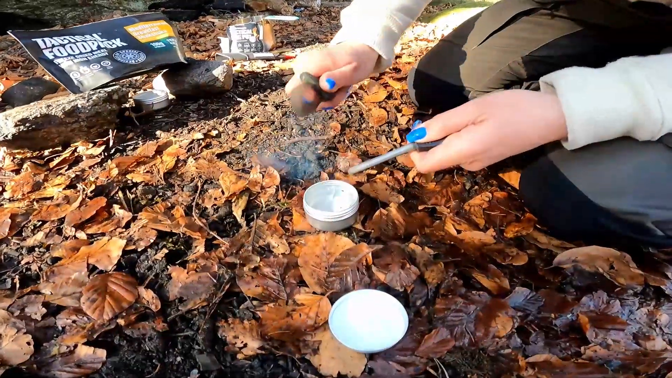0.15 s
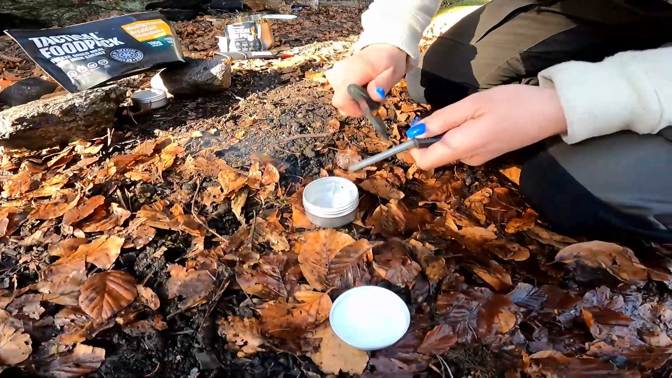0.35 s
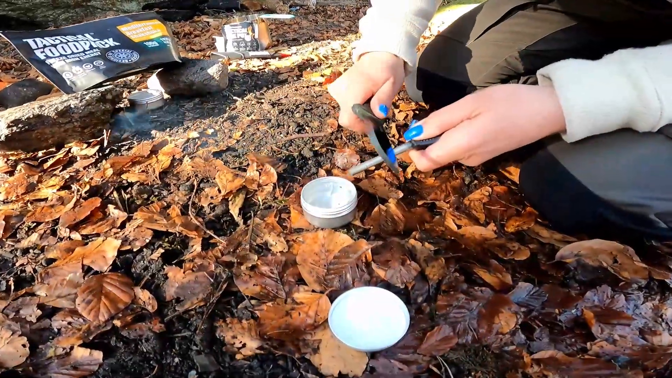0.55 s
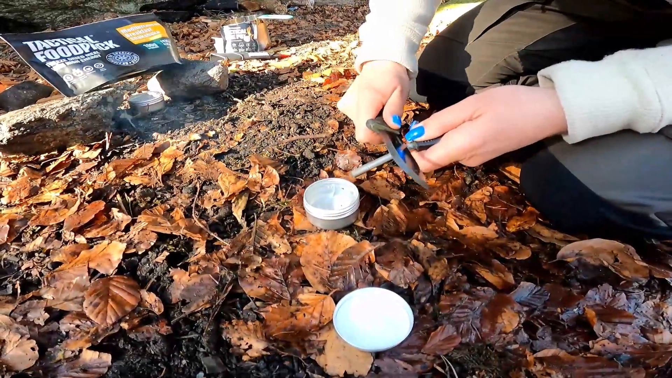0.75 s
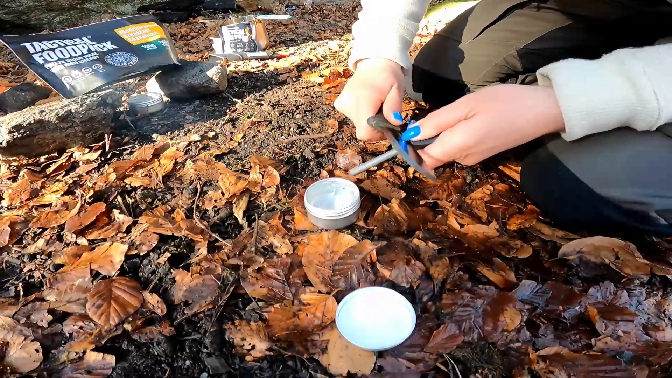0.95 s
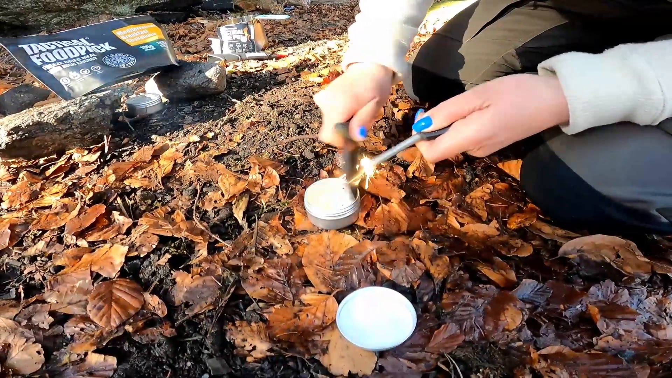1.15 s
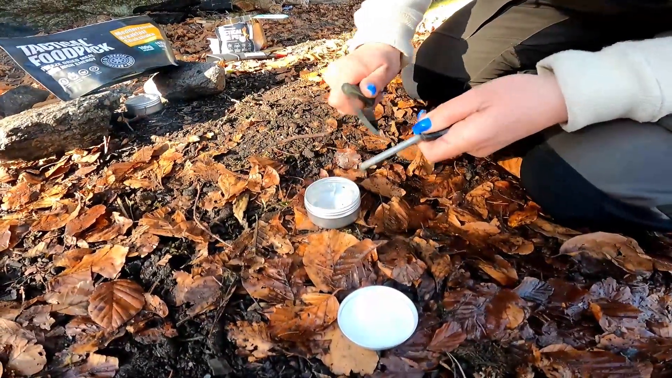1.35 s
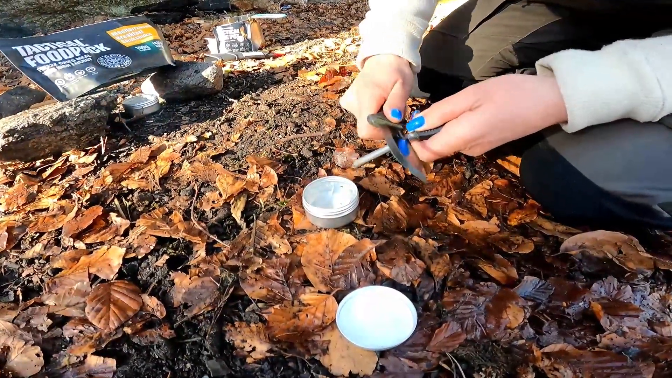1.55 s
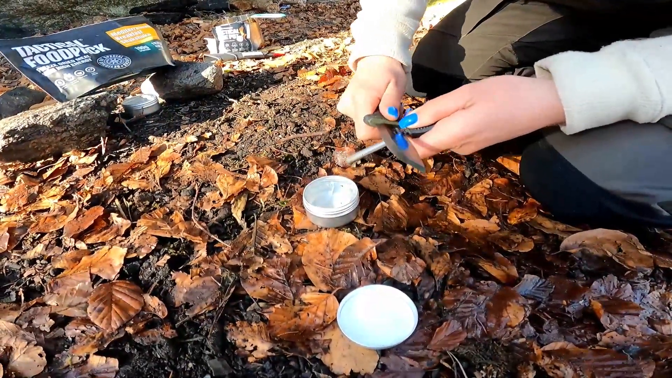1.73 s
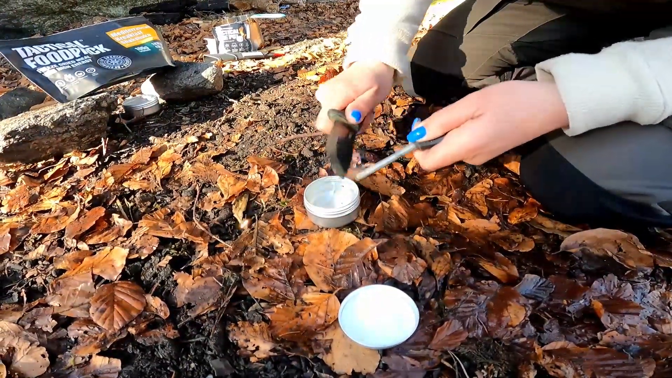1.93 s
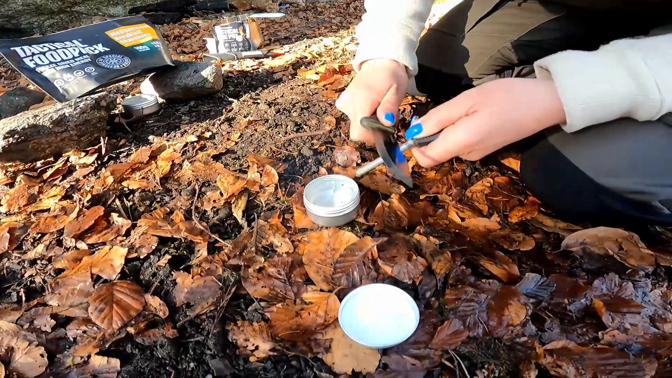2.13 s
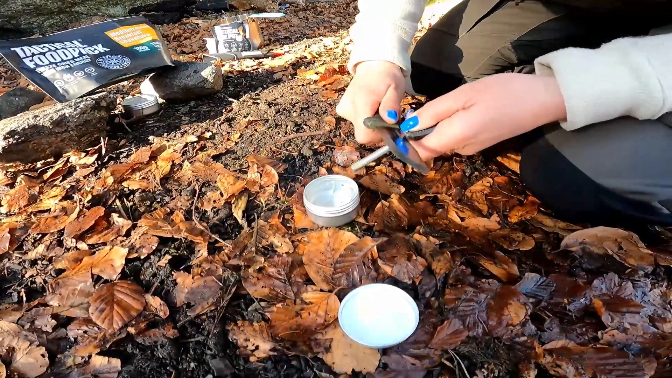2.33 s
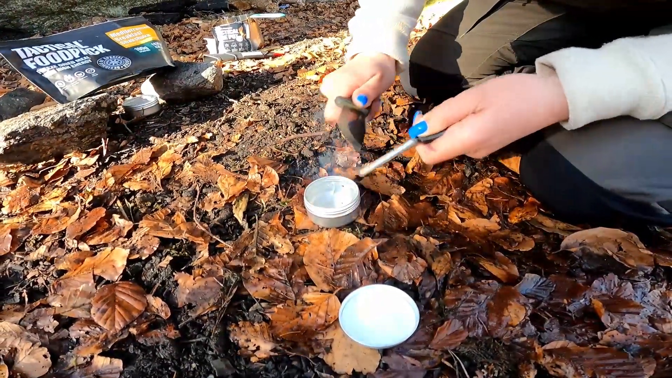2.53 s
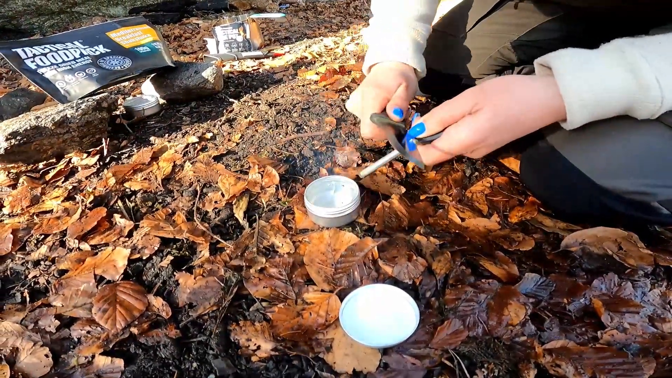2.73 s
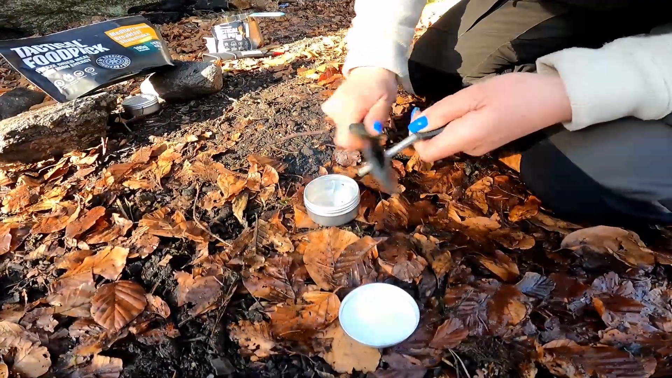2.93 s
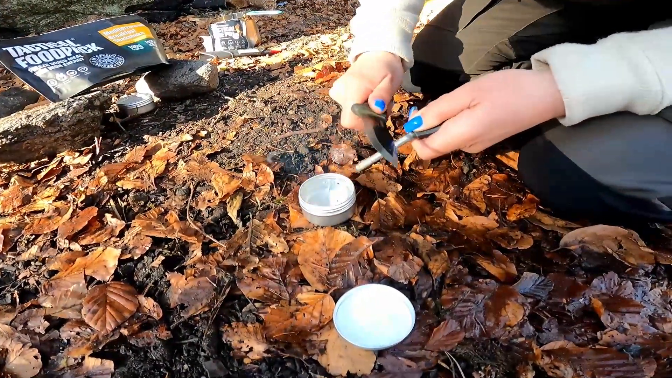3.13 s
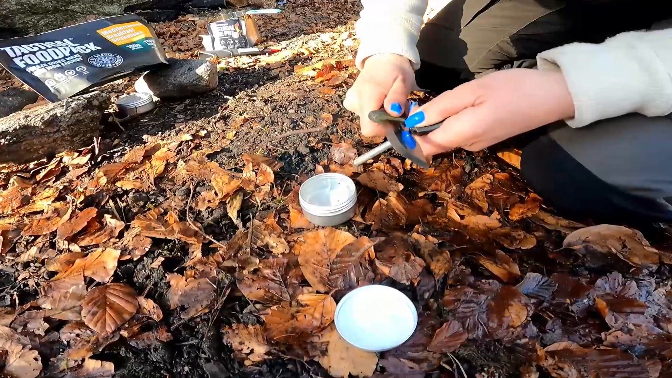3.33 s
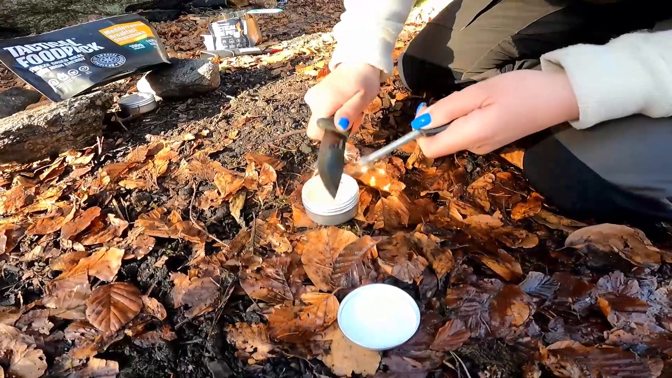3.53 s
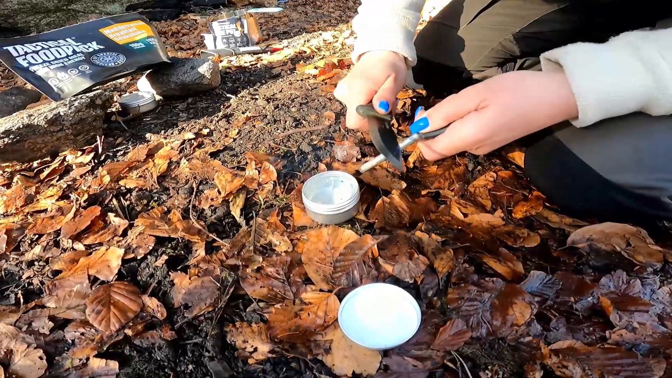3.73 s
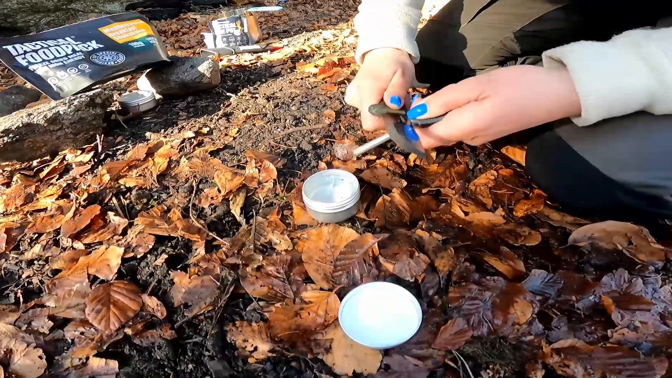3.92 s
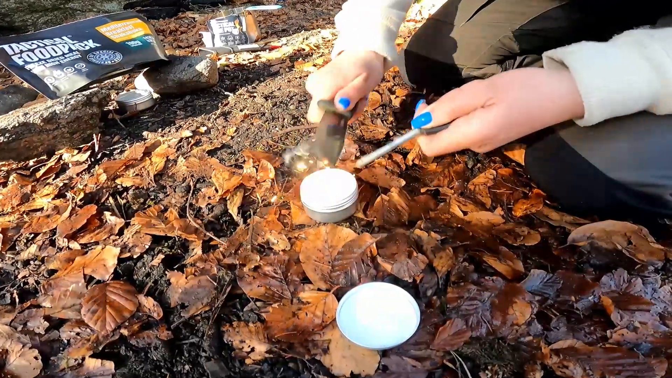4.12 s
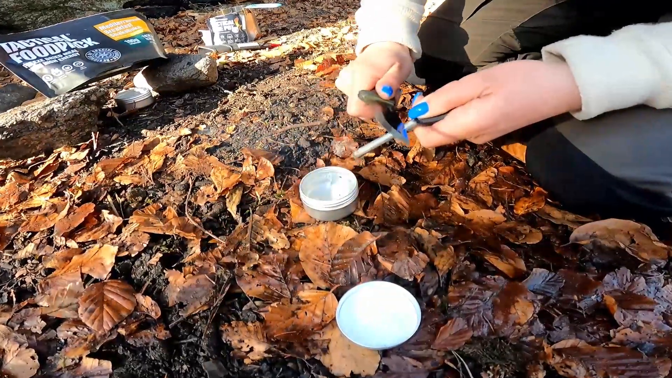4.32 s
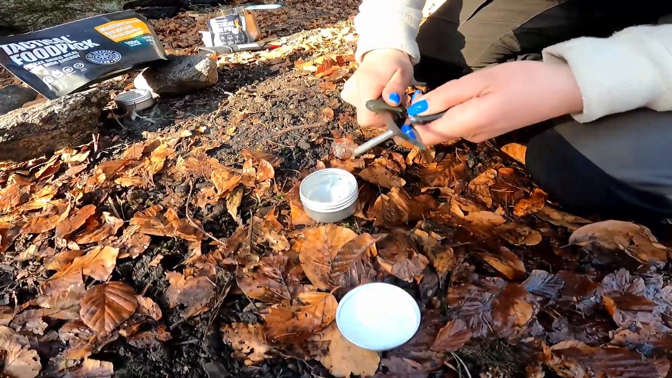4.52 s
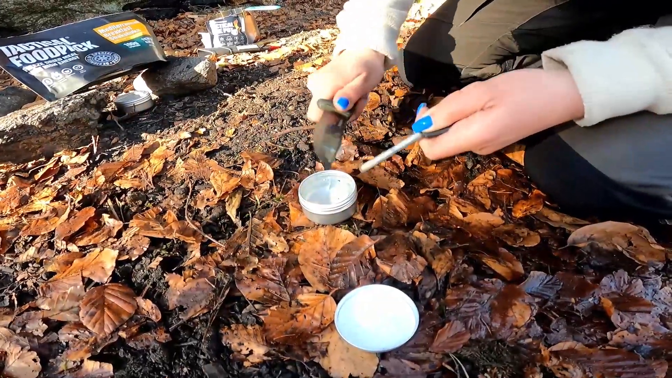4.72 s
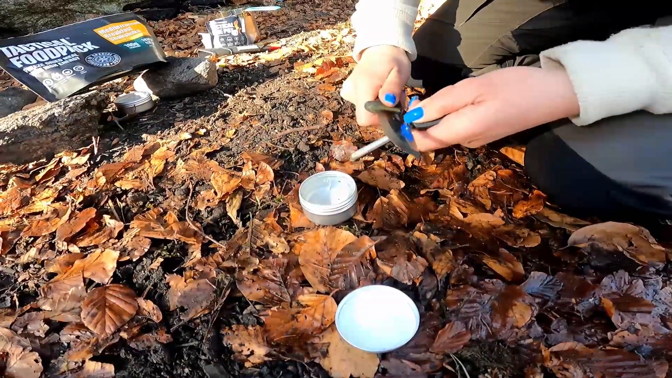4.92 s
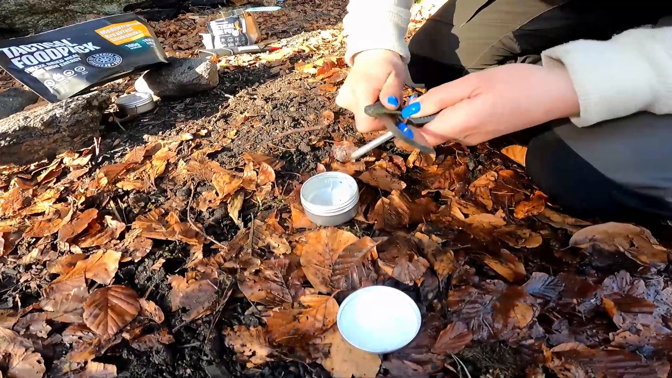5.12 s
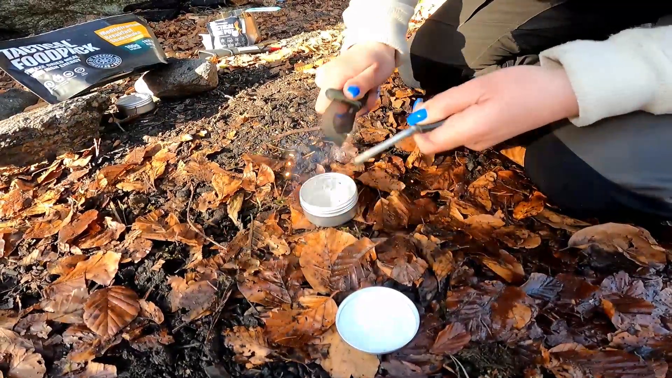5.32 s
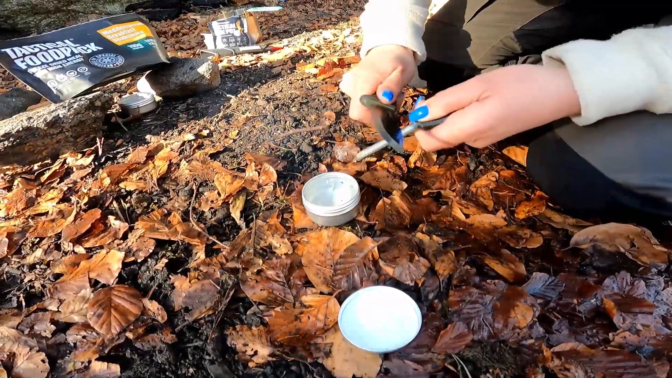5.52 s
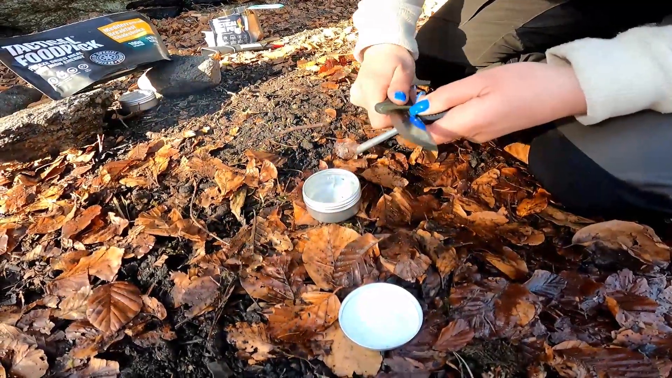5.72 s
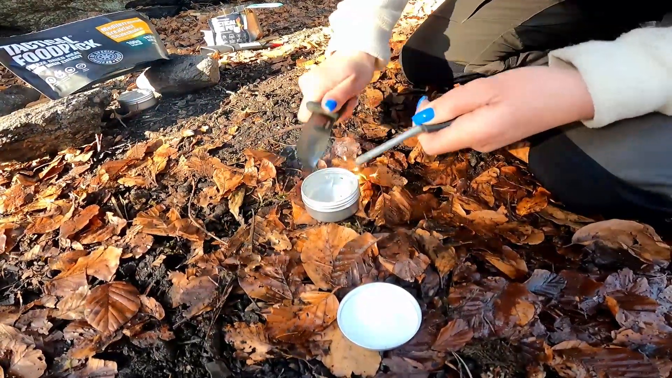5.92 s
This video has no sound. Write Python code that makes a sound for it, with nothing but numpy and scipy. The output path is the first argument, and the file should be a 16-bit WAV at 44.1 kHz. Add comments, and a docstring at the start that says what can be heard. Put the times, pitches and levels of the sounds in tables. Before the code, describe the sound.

Close up on a leafy forest floor, a steel striker is pushed down a fire-starting rod nine times. Most strokes begin with a short, hand-damped metallic click, then a bright rasp that bites, snaps and bursts into crackling sparks, ending abruptly with tiny ticks. Quiet air and a faint, distant low hum lie behind. The close microphone sounds dry, with slightly dulled top treble and almost no echo.

```python
"""On a forest floor, close by, a steel blade is set on a ferro rod and pushed down it nine times.
Each touch rings the hand-damped steel: a sum of short, fading tones.
Each stroke skims, bites, snags and throws sparks that sizzle out on the leaves: random grains, filtered.
Behind lie quiet forest air, made of filtered noise, and a low, distant hum: a wavering tone and narrow noise."""
import sys
import numpy as np
from scipy import signal
from scipy.fft import rfft, irfft, next_fast_len
from scipy.io import wavfile

SR = 44100
rng = np.random.default_rng(int(sys.argv[2]) if len(sys.argv) > 2 else 0)


def store_wav(level_fs):
    """Save 16-bit WAV to argv[1]."""
    pcm = np.round(np.clip(np.atleast_2d(level_fs), -1, 1) * 32767)
    wavfile.write(sys.argv[1], SR, pcm.T.astype(np.int16))


N = 262836  # length in samples
TIME = np.arange(N) / SR
FREQ = np.maximum(np.fft.rfftfreq(N, 1 / SR), 1)

# tone colour of the skimming edge: pitch_hz, level_db (per Hz, relative)
SKIM_COLOUR = [(60, -55), (200, -26), (1500, -19), (2100, -14), (2450, -2.5), (2850, -3.5), (3250, -1),
               (4050, 4), (5000, -6.5), (6600, -11.5), (8500, -27.5), (11500, -14.5), (14500, -36)]
# tone colour of a snag: pitch_hz, level_db (per Hz, relative)
SNAG_COLOUR = [(50, -47), (200, -22.5), (800, -13), (1700, -13.5), (2600, 3), (3500, 6), (4600, -2.5),
               (5700, -1), (7500, -17.5), (9000, -16), (15000, -15.5)]


def undb(db):
    """Turn decibels into a gain."""
    return 10 ** (np.asarray(db) / 20)


def unit(x):
    """Scale to an average (rms) level of 1."""
    return x / np.sqrt(np.mean(x ** 2))


def convolve(x, impulse):
    """Pass a track through an impulse response."""
    return signal.fftconvolve(x, impulse)[:N]


def add(track, start_s, sound):
    """Mix a sound into a track at a given time."""
    start = int(start_s * SR)
    track[start:start + len(sound)] += sound[:N - start]


def response(colour, size=2048):
    """Build a filter that answers at once (minimum phase) from rows of pitch_hz, level_db."""
    hz, db = np.transpose(colour)
    f = np.maximum(np.fft.rfftfreq(size, 1 / SR), 1)
    level_db = np.interp(np.log(f), np.log(hz), db)
    cepstrum = irfft(np.log(undb(level_db)))
    # folding the second half onto the first leaves no sound ahead of the impulse
    cepstrum[1:size // 2] *= 2
    cepstrum[size // 2 + 1:] = 0
    return irfft(np.exp(rfft(cepstrum)))


def band(x, hz, width_hz):
    """Apply the same resonance twice, for steep sides."""
    resonance = 1 / (1 + 1j * (FREQ / hz - hz / FREQ) * hz / width_hz)
    return irfft(rfft(x) * resonance ** 2, N)


def walk(rate_hz):
    """Wander at random between two new values per cycle of the rate, with an rms of 1."""
    return unit(np.interp(TIME * 2 * rate_hz, np.arange(N), rng.standard_normal(N)))


def swells(rows):
    """Bell-shaped swells from rows of peak_s, level_db, length_s (the bell's standard deviation)."""
    return sum(undb(db) * np.exp(-.5 * ((TIME - t) / length) ** 2) for t, db, length in rows)


def grains(per_second, spread_db):
    """Tiny fractures at random moments, of uneven size."""
    happens = rng.random(N) < per_second / SR
    size = rng.standard_normal(N) * undb(spread_db * rng.standard_normal(N))
    return happens * size


def strokes():
    """Gains of edge, rod ring, sparks and puff: pressure builds, the edge bites and runs off, sparks flare and fade."""
    # nine strokes: start_s, attack_s, bite_s (after the start), scrape_db, ring_db, spark_db,
    # fade_db_per_s (of the sparks), puff_db
    stroke_rows = [ (0.126, 0.08, 0.1, -15.5, -36, -14.5, 402, -17.5),
                   (1.303, 0.033, 0.062, -17, -44, -17, 1098, -26.5),
                   (1.977, 0.031, 0.072, -17, -34, -18, 578, -25),
                   (2.554, 0.03, .068, -15.5, -35, -13, 515, -19.5),
                   (3.085, .04, .096, -19, -27.5, -18, 556.5, -28.5),
                   (3.634, .026, 0.069, -16, -33, -16.5, 328.5, -25.5),
                   (4.181, 0.03, 0.078, -17, -23, -13, 247, -20),
                   (4.761, 0.031, 0.069, -21.5, -21, -19, 946.5, -50),
                   (5.337, .02, 0.067, -16.5, -17.5, -12.5, 349.5, -21)]
    bite_db, bite_length_s = 5, 0.0061  # extra scraping as the edge digs in
    lift_db_per_s = 617  # the scraping dies as the edge runs off the rod
    ring_length_s = 0.01  # the rod rings briefly as the pressure comes fully on
    kindle_db = 38.5  # steepness of the sparks' rise: dB per time from start to bite
    burn_s = 0.0078  # the sparks burn fully this long either side of the bite
    puff_lag_s, puff_length_s = .007, 0.015  # the puff of hot air follows the bite
    edge, ring, sparks, puff = np.zeros((4, N))
    for start_s, attack_s, bite_s, scrape_db, ring_db, spark_db, fade_db_per_s, puff_db in stroke_rows:
        t, bite = TIME - start_s, start_s + bite_s
        pressure = np.clip(t / attack_s, 0, 1) ** 2
        before = np.maximum(bite - burn_s - TIME, 0)
        after = np.maximum(TIME - bite - burn_s, 0)
        dig_db = bite_db * swells([(bite, 0, bite_length_s)])
        edge += pressure * undb(scrape_db + dig_db - lift_db_per_s * after)
        ring += pressure * swells([(start_s + attack_s, ring_db, ring_length_s)])
        sparks += (t > 0) * undb(spark_db - kindle_db * before / bite_s - fade_db_per_s * after)
        puff += swells([(bite + puff_lag_s, puff_db, puff_length_s)])
    return edge, ring, sparks, puff


def steel(upper_db=0, detune=0, size=2048):
    """Ring of blade and rod; the contact point sets the share of the upper tones, the grip detunes all."""
    # blade and rod, damped by the hands: pitch_hz, level_db, t60_s (time to fade by 60 dB)
    steel_modes = [(1260, -9, 0.02), (1420, -5.5, 0.0094), (2020, -20, 0.027), (2083, -21, 0.0098),
                   (2840, -43, .008), (3253, 13.5, 0.013), (3580, 2.5, 0.015), (4096, -1, 0.0071),
                   (4250, -5, 0.022), (5334, -1, 0.0051), (6330, -26.5, .005), (9900, -37, .005)]
    hz, db, t60 = np.transpose(steel_modes)[:, :, None]
    t = np.arange(size) / SR
    gain = undb(db + upper_db * (hz > 3700))
    fade = np.exp(-np.log(1000) * t / t60)
    ring = np.sum(gain * fade * np.sin(2 * np.pi * hz * (1 + detune) * t), axis=0)
    # thin metal radiates little bass, and the contact is too soft for the very top
    ring = signal.sosfilt(signal.butter(2, [750, 8000], "band", fs=SR, output="sos"), ring)
    return ring / np.abs(ring).max()


def clumps(x, depth_db=3.0, rate_hz=70, count=12):
    """The contact point travels along the rod: overlapping bands swell and fade at random."""
    size = next_fast_len(N)
    spectrum, f = rfft(x, size), np.fft.rfftfreq(size, 1 / SR)
    centres_hz = np.geomspace(1000, 7000, count)
    out = 0
    for share in np.eye(count):
        part = irfft(spectrum * np.interp(f, centres_hz, share), size)[:N]
        out = out + part * undb(depth_db * walk(rate_hz))
    return unit(out)


def scraping(edge_gain, ring_gain, spark_gain, judder_db=1.5, chatter_db=1.5,
             ring_db=-6, skim_db=-1, slide_edge_db=-4, dense_db=-20):
    """The edge tears off grains in uneven slips; shavings ignite at the bite, then thin out into single pops."""
    # the blade brushes the rod on its way back up: peak_s, level_db, length_s
    slide_rows = [(.083, -37, 0.012), (1.135, -34.5, 0.0093), (1.244, -40.5, 0.0088),
                  (1.873, -37.5, 0.0093), (5.25, -34.5, 0.013)]
    # tone colour of the burning shavings: pitch_hz, level_db (per Hz, relative)
    spark_colour = [(50, -55.5), (130, -13.5), (350, 1.5), (900, 2), (1500, -4.5), (2000, 1.5), (2600, 4),
                    (3400, -6.5), (5000, -7), (7300, -18), (8900, -19), (10800, -13.5), (14500, -29)]
    slips = unit(undb(judder_db * walk(130) + chatter_db * walk(600)))
    edge = clumps(convolve(grains(9000, 2.9), response(SKIM_COLOUR)))
    ring = unit(convolve(grains(6000, 4.1), steel()))
    # weak sparks mean fewer grains; each is made larger to make up for it
    density = np.clip(spark_gain / undb(dense_db), .15, 1)
    pops = grains(4000 * density, 1.64) / np.sqrt(density)
    sparks = clumps(convolve(pops, response(spark_colour)))
    skim = (edge + undb(ring_db) * ring) * undb(skim_db) * edge_gain
    slides = (ring + undb(slide_edge_db) * edge) * (ring_gain + swells(slide_rows))
    return slips * (skim + slides + spark_gain * sparks)


def touches(graze_db=-30, graze_s=0.011, size=3000):
    """The blade lands on the rod, rebounds once and grazes it as it settles."""
    # landings: start_s, level_db, upper_db (of the upper tones), delay_s (of the rebound),
    # detune (by the grip, as a share)
    touch_rows = [(0.8726, -3, 7, .00125, .02), (1.7778, -1, 5.5, .00125, 0.014),
                  (2.4416, -3, 5, .00125, 0.026), (2.9839, 3, -0.5, 0.0016, 0.0054),
                  (3.4815, -3, 4.5, .00127, -0.0068), (4.081, 7, 6.5, 0.001253, -.01),
                  (4.6704, 0, 8.5, 0.00097, -.03), (5.157, -6.5, -14.5, 0.0018, -0.015),
                  (5.8924, -2, 3, 0.0018, -0.0031)]
    out, rebound = np.zeros(N), .65
    fade = np.exp(-np.arange(size) / SR / graze_s)
    for start_s, level_db, upper_db, delay_s, detune in touch_rows:
        add(out, start_s, undb(level_db) * steel(upper_db, detune))
        second_upper_db = upper_db + 3 * rng.standard_normal()
        add(out, start_s + delay_s, rebound * undb(level_db) * steel(second_upper_db, detune))
        graze = unit(np.convolve(rng.standard_normal(size), response(SKIM_COLOUR))[:size])
        add(out, start_s, undb(level_db + graze_db) * graze * fade)
    return out


def snags(crumble=0.2, crumble_s=0.0016, size=800):
    """A chip or spark cracks: one sharp knock, then a fading burst of small random ones."""
    # the edge snags or a spark pops: start_s, peak_db, low_db (change below 2000 Hz)
    snag_rows = [(.233, 3, 11.5), (.258, -4, -11), (.267, -5.5, -29), (1.141, -12.5, 11), (1.361, 2.5, 3),
                 (1.371, 7.5, -25), (2.0442, 1, -5), (2.067, -8, 11), (2.615, 3, 1), (2.673, -18, 22),
                 (2.758, -28.5, 10), (2.915, -29.5, 18), (3.166, 1, 11), (3.185, -15, 34), (3.289, -23, 15),
                 (3.787, -19, 16.5), (4.252, 7, -14), (4.296, -3, 3), (4.3256, 5.5, 1), (4.379, -20.5, 23),
                 (4.411, -17.5, 11), (4.84, 2.5, -25.5), (5.421, -1, 1), (5.527, -16, 13.5)]
    for_size = np.arange(size) / SR
    out = np.zeros(N)
    for start_s, peak_db, low_db in snag_rows:
        force = crumble * rng.standard_normal(size) * np.exp(-for_size / crumble_s)
        force[0] = 1
        colour = [(hz, db + low_db * (hz < 2000)) for hz, db in SNAG_COLOUR]
        sound = np.convolve(force, response(colour))
        add(out, start_s, undb(peak_db) * sound / np.abs(sound).max())
    return out


def sizzle(spark_gain, crackle_db=-25, fade_s=0.041, ember_hz=1900, ember_width_hz=1100,
           tick_db=-30, tick_fade_s=0.22):
    """Sparks burn out in a fine crackle, the last ones tick on the leaves; one shaving fizzes on."""
    # a shaving fizzes on among the leaves: peak_s, level_db, length_s
    ember_rows = [(.37, -50, 0.065)]
    # each spark level trails off exponentially
    afterglow = convolve(spark_gain, np.exp(-TIME / fade_s) / (fade_s * SR))
    stragglers = convolve(spark_gain, np.exp(-TIME / tick_fade_s) / (tick_fade_s * SR))
    crackle = unit(convolve(grains(3100, 1.2), response(SNAG_COLOUR)))
    ticks = unit(convolve(grains(110, 2), response(SKIM_COLOUR)))
    ember = unit(band(rng.standard_normal(N), ember_hz, ember_width_hz))
    burning = undb(crackle_db) * afterglow * crackle
    return burning + undb(tick_db) * stragglers * ticks + swells(ember_rows) * ember


def flares(puff_gain, hz=190, width_hz=170):
    """Each shower of sparks heats the air in one soft puff of low noise."""
    return puff_gain * unit(band(rng.standard_normal(N), hz, width_hz))


def surroundings(x, echo_s=0.012, echo_db=-28, scatter_db=-31, t60=0.076):
    """One weak echo from close by, and a quick scatter from the ground and the trunks."""
    t = TIME[:SR]
    scatter = rng.standard_normal(SR) * np.exp(-np.log(1000) * t / t60) * (t > echo_s)
    scatter *= undb(scatter_db) / np.linalg.norm(scatter)
    scatter[int(echo_s * SR)] += undb(echo_db)
    return x + convolve(x, scatter)


def forest(low_trim_db=-0.5, hiss_trim_db=0.5, split_hz=700,
           rustle_db=-76, rustle_hz=11000, rustle_width_hz=7000):
    """Soft air, as noise with a wavering low end, and the finest ticking of dry leaves."""
    # tone colour of forest air: pitch_hz, level_db (per Hz, relative)
    air_colour = [(25, -42.5), (55, -14.5), (110, -4), (170, 3), (260, -1.5), (400, -7.5), (800, -18.5),
                  (1800, -26), (5000, -37.5), (7500, -47), (9000, -59.5), (12000, -42.5), (15000, -52)]
    # the air over time, before the trims: time_s, low_db, hiss_db
    air_course = [(0.0, -42, -46.5), (0.45, -41.5, -52), (5.26, -43.5, -52.5), (5.96, -40, -53.5)]
    t, low_db, hiss_db = np.transpose(air_course)
    air = rfft(convolve(rng.standard_normal(N), response(air_colour)))
    low_share = 1 / (1 + (FREQ / split_hz) ** 4)
    rumble_level_db = np.interp(TIME, t, low_db) + low_trim_db + 0.74 * walk(7.8)
    rumble = unit(irfft(air * low_share, N)) * undb(rumble_level_db)
    hiss = unit(irfft(air * (1 - low_share), N)) * undb(np.interp(TIME, t, hiss_db) + hiss_trim_db)
    leaves = unit(band(grains(120, 3.0), rustle_hz, rustle_width_hz))
    return rumble + hiss + undb(rustle_db) * leaves


def hum(tone_hz=82.8, waver=0.0087):
    """A far-off motor: a wavering low tone that comes and goes, under a few blurred tones of narrow noise."""
    # level of the low tone, before its random drift: time_s, level_db
    tone_course = [(0, -42), (3.1, -48), (4.3, -67.5), (5, -65), (5.5, -50.5)]
    # blurred tones: pitch_hz, width_hz, level_db
    blurred_tones = [(168.75, 4.2, -51), (197, 9.7, -46), (269.8, 7.9, -53.5), (329.2, 32, -51.5)]
    level = undb(np.interp(TIME, *np.transpose(tone_course)) + 1.37 * walk(1.3))
    pitch_hz = tone_hz * (1 + waver * walk(4.2))
    tone = unit(np.sin(2 * np.pi * np.cumsum(pitch_hz) / SR))
    out = level * tone
    for hz, width_hz, db in blurred_tones:
        out += undb(db) * unit(band(rng.standard_normal(N), hz, width_hz))
    return out


def ports(x, split_hz=11000, lean=.3, spread_s=.005, size=600):
    """Lows reach both microphone ports alike; the top treble scatters differently to each and leans right."""
    treble = irfft(rfft(x) / (1 + (split_hz / FREQ) ** 7), N)
    scatter = rng.standard_normal(size) * np.exp(-np.arange(size) / SR / spread_s)
    difference = convolve(treble, scatter / np.linalg.norm(scatter)) - lean * treble
    return np.array([x + difference, x - difference])


def scene():
    """Striker and sparks in front of the forest."""
    edge, ring, sparks, puff = strokes()
    striker = scraping(edge, ring, sparks) + touches() + snags() + sizzle(sparks) + flares(puff)
    return ports(surroundings(striker) + forest() + hum())


def record(dry, rumble_hz=40, top_hz=16000):
    """The microphone notches and dulls the treble; the recorder rounds loud peaks, cuts rumble and top."""
    # the microphone's tone colour: pitch_hz, level_db
    mic_colour = [(20, -10), (70, -4.5), (7800, -0.5), (8500, -8.5), (8950, -15.5), (9500, -8.5),
                  (10300, -7.5), (12500, -8.5), (14000, -15), (16000, -32.5)]
    heard = np.array([convolve(x, response(mic_colour)) for x in dry])
    rounded = heard / (1 + heard ** 8) ** (1 / 8)
    trimmed = signal.sosfilt(signal.butter(1, rumble_hz, "high", fs=SR, output="sos"), rounded)
    return signal.sosfilt(signal.ellip(8, .2, 70, top_hz, fs=SR, output="sos"), trimmed)


dry = scene()
out = record(dry)
store_wav(out)
```